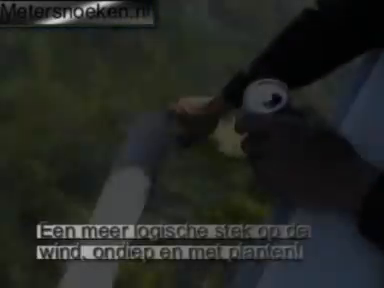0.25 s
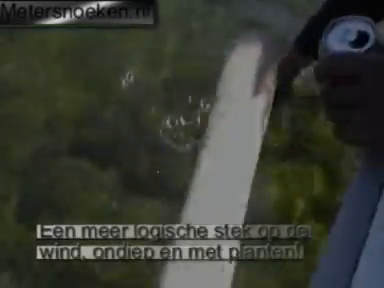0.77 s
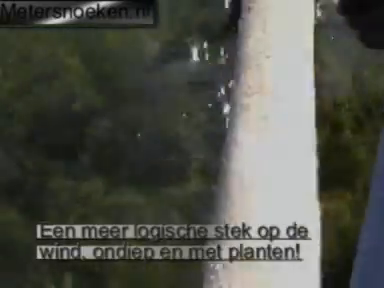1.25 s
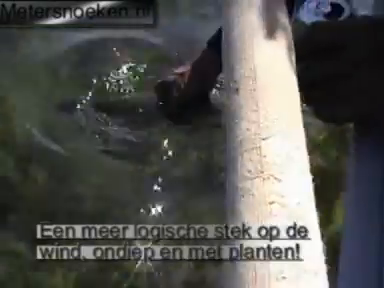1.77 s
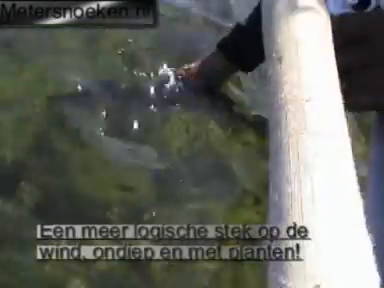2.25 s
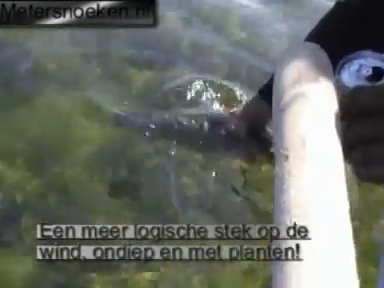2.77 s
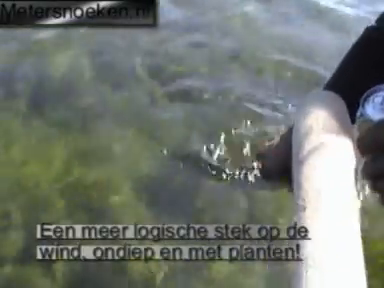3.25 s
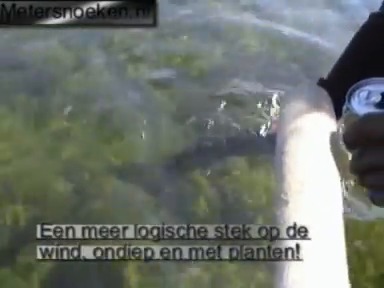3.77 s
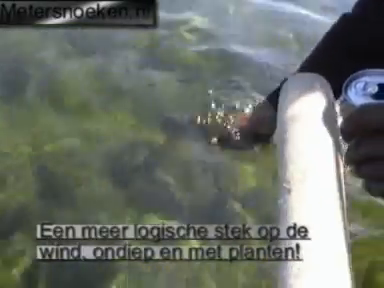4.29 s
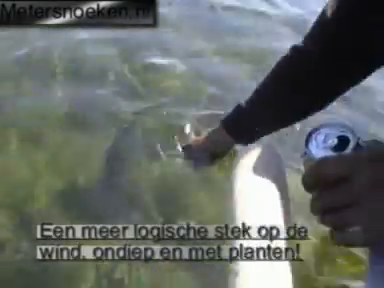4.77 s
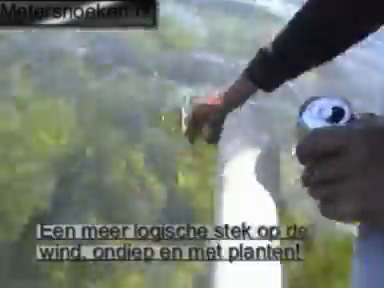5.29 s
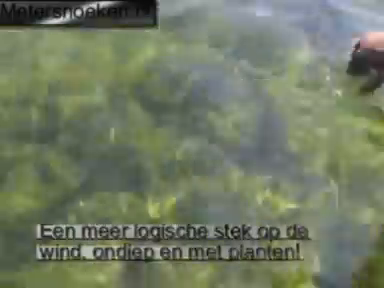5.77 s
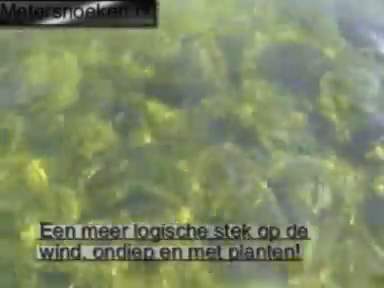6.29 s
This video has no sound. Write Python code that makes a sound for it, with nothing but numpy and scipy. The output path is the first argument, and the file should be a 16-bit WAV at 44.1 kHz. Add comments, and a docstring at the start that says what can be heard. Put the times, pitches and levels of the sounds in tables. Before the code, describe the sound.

Sparse water droplets and soft hull bumps open quietly, then an oar rattles sharply in its lock and bubbles plop around a stirring hand. Tiny pinging drips fill a calm middle while a small bird chirps far off on shore. Water bursts into crisp splashes and gurgles near the end. Outdoor, close stereo pickup, slightly left, with low rumble, light breeze and faint motor hum.

```python
"""Hand stirring a calm lake

Beside a rowing boat, drops tick and splatter (shaped noise), bubbles plop (gliding decaying sines),
the hull gulps once (a rising cavity note) and small waves slosh (swarms of tiny bubbles).
The oar clacks in its lock (struck resonances); far off on the shore a small bird sings (gliding whistles).
Boat rumble and breeze lie beneath. A camera's motor whirs faintly and its hum filter combs everything.
"""
import sys
import numpy as np
from scipy import signal
from scipy.fft import rfft, irfft, next_fast_len
from scipy.io import wavfile
from scipy.ndimage import uniform_filter1d

SR = 44100
rng = np.random.default_rng(int(sys.argv[2]) if len(sys.argv) > 2 else 0)


def persist_wave(psi):
    """Save psi, clipped to +-1, as 16-bit WAV."""
    counts = np.round(np.clip(psi, -1, 1) * 32767).astype(np.int16)
    wavfile.write(sys.argv[1], SR, np.atleast_2d(counts).T)


N = 287973


def amp(db):
    """Decibel law: a level becomes a gain."""
    return 10 ** (np.asarray(db) / 20)


def unit(x):
    """Power normalisation: scale to rms 1."""
    return x / np.sqrt(np.mean(x ** 2) + 1e-20)


def along(points, hz):
    """Logarithmic frequency: interpolate (Hz, value) points on a log axis."""
    f, v = np.transpose(points)
    return np.interp(np.log(hz + 1), np.log(f + 1), v)


def curves(rows):
    """Linear interpolation: one value per sample for each column after the time."""
    s, *cols = np.transpose(rows)
    return [np.interp(np.arange(N) / SR, s, c) for c in cols]


def add(track, s, sound):
    """Superposition: mix a sound into a track at time s."""
    part = track[..., max(round(s * SR), 0):][..., :sound.shape[-1]]
    part += sound[..., :part.shape[-1]]


def filtered(x, response):
    """Linear filtering: multiply the spectrum of x by a response of frequency."""
    n = x.shape[-1]
    m = next_fast_len(n + SR // 8)  # zero padding leaves room for the filter's tail
    return irfft(rfft(x, m) * response(np.fft.rfftfreq(m, 1 / SR)), m)[..., :n]


def shape(points):
    """Spectral envelope: a gain over frequency from (Hz, dB) points."""
    return lambda hz: amp(along(points, hz))


def resonance(hz, centre, width):
    """Damped oscillator: one causal resonance of gain 1 at its centre."""
    return 1j * hz * width / (centre ** 2 - hz ** 2 + 1j * hz * width)


# Left-right correlation of nearby sounds: f/Hz, correlation
NEAR_CORRELATION = [(60, 0.058), (250, 0.34), (600, 0.52), (1200, 0.87), (4000, 0.88), (8000, 0.69),
                    (12000, 0.071)]


def spread(pair, colour, alike=NEAR_CORRELATION):
    """Interchannel correlation: mix two unrelated signals as mid and side into stereo of rms 1."""
    def mid_side(hz):
        angle = np.arccos(np.clip(along(alike, hz), -1, 1)) / 2
        return colour(hz) * np.array([np.cos(angle), np.sin(angle)])
    mid, side = filtered(pair, mid_side)
    return unit(np.array([mid + side, mid - side]))


def noise(colour, size=N, alike=NEAR_CORRELATION):
    """Filtered white noise: coloured stereo of rms 1."""
    return spread(rng.standard_normal((2, size)), colour, alike)


def fizz(spectrum, rate, centre_hz, cycles, scatter_db):
    """Bubble swarm: random grains, rate per second, start softly and rise in pitch; rms 1."""
    count = int(rate * N / SR)
    when, size, pitch, side = rng.random((count, 4)).T[..., None]
    t = np.arange(SR // 100) / SR
    hz = centre_hz * 2 ** (3 * (pitch - .5))  # within 1.5 octaves of the centre
    age = t * hz / cycles
    life = (np.exp(-age) - np.exp(-4 * age)) * (1 - t / t[-1])
    tone = np.sin(2 * np.pi * hz * t * (1 + .015 * np.minimum(age, 6)))
    grains = amp(-scatter_db * np.log(size + .02)) * life * tone
    at = (when * N).astype(int) + np.arange(len(t))
    pair = np.array([unit(np.bincount(at.ravel(), (grains * g).ravel(), N)[:N]) for g in (1, side - .5)])
    return spread(pair, shape(spectrum))


# Left-right correlation of the camera noise: f/Hz, correlation
CAMERA_CORRELATION = [(200, -0.25), (800, 0.38), (4000, 0.77), (7000, 0.2), (9500, 0.17), (11000, -0.75),
                      (12500, -0.9)]
# Spectrum of the drum's ticks: f/Hz, relative level/dB
DRUM_SPECTRUM = [(100, -70), (3000, -25), (5500, -21), (6400, -33), (7000, 13), (8200, 26.5), (9000, -5),
                 (10400, 22.5), (12500, 16)]
HUM_HZ = 150  # turns of the camera's motor per second


def drum_buzz():
    """Periodic impulses: the camera's drum ticks twice a turn, a quarter period apart in mid and side."""
    period = round(SR / HUM_HZ / 2)
    phase = np.arange(N) % period
    ticks = 1. * np.array([phase == 0, phase == period // 4])
    return spread(ticks, shape(DRUM_SPECTRUM), CAMERA_CORRELATION)


# Resonances of the motor's whir: f/Hz, width/Hz, level/dB re CAMERA_LEVEL
WHIR_RESONANCES = [(385, 310, -37), (903.6, 101, -12), (2700, 340, -16)]


def motor_whir():
    """Resonant noise: bands of noise, each filtered twice by one resonance."""
    return sum(amp(db) * noise(lambda hz: resonance(hz, centre, width) ** 2, alike=CAMERA_CORRELATION)
               for centre, width, db in WHIR_RESONANCES)


# Steady motor tones: f/Hz, level/dB re CAMERA_LEVEL
MOTOR_TONES = [(433, -23.5), (727, -18.5), (831, -45)]


def motor_whine(waver_db=2):
    """Amplitude modulation: sines whose levels waver slowly and independently (rms waver in dB)."""
    t = np.arange(N) / SR
    out = np.zeros(N)
    for hz, db in MOTOR_TONES:
        waver = waver_db * unit(filtered(rng.standard_normal(N), lambda f: f < 5))
        out += amp(db + waver) * np.sqrt(2) * np.sin(2 * np.pi * hz * t)
    return out


# Spectrum of air and camera hiss: f/Hz, relative level/dB
HISS_SPECTRUM = [(25, -52), (60, -46), (135, -3.5), (250, -23), (430, -3), (700, -15.5), (1600, -15.5),
                 (2700, -11.5), (4500, -14.5), (6200, -12), (8000, -15.5), (10500, -11.5), (12000, -15),
                 (13500, -32)]
# Common gain of hiss and motor: t/s, level/dB
CAMERA_LEVEL = [(0, -60), (.35, -59.5), (.7, -56), (1, -53), (1.6, -50), (3, -50.5), (5, -50), (6.53, -51)]


def camera():
    """Broadband and tonal machine noise: hiss, whir, whine and buzz share one slow level curve."""
    level_db, = curves(CAMERA_LEVEL)
    hiss = amp(-6) * noise(shape(HISS_SPECTRUM), alike=CAMERA_CORRELATION)
    return amp(level_db) * (hiss + motor_whir() + motor_whine() + amp(7.5) * drum_buzz())


# Puffs of breeze on the microphone: t/s of the peak, level/dB
BREEZE_PUFFS = [(1.599, -63), (2.17, -64.5)]
# Spectrum of the breeze: f/Hz, relative level/dB
BREEZE_SPECTRUM = [(20, -29), (55, 2.5), (100, 1.5), (200, -5.5), (600, -62), (2000, -100)]
# Left-right correlation of the breeze: f/Hz, correlation
BREEZE_CORRELATION = [(40, -0.33), (200, 0.088)]
PUFF_RISE_S, PUFF_FALL_S, CALM_DB = 0.052, 0.16, -82.5  # time constants; level between puffs


def breeze():
    """Turbulence noise: puffs brush the microphone ports and die away exponentially."""
    t = np.arange(N) / SR
    air = np.full(N, amp(CALM_DB))
    for s, db in BREEZE_PUFFS:
        air += amp(db) * np.exp(-np.maximum((s - t) / PUFF_RISE_S, (t - s) / PUFF_FALL_S))
    return air * noise(shape(BREEZE_SPECTRUM), alike=BREEZE_CORRELATION)


# Soft bumps of the boat: t/s, level/dB
BOAT_BUMPS = [(0.152, -55), (0.981, -64), (1.39, -69), (1.559, -76), (2.451, -61.5), (3.57, -75),
              (5.391, -69), (6.289, -72)]
# Spectrum of the hull's rumble: f/Hz, relative level/dB
HULL_SPECTRUM = [(25, -45), (60, -33), (120, -1.5), (190, 2), (350, 1.5), (700, -3.5), (2000, -74)]
# Left-right correlation of the hull's rumble: f/Hz, correlation
HULL_CORRELATION = [(60, 0.66), (200, 0.82), (600, 0.95)]
BUMP_RISE_S, BUMP_T60_S, RUMBLE_DB = 0.011, 0.64, -70.5  # the rumble level excludes hull_db


def boat(hull_db=-1.0, boom_hz=195, boom_db=-1, boom_t60=0.27):
    """Modal and broadband response: a steady rumble swells and the hull booms softly at each bump."""
    t = np.arange(N) / SR
    rumble, boom = np.full(N, amp(RUMBLE_DB)), np.zeros(N)
    rise = np.minimum(t / BUMP_RISE_S, 1)
    for s, db in BOAT_BUMPS:
        add(boom, s, rise * amp(db + boom_db - 60 * t / boom_t60) * np.sin(2 * np.pi * boom_hz * t))
        add(rumble, s, rise * amp(db - 60 * np.maximum(t - BUMP_RISE_S, 0) / BUMP_T60_S))
    return boom + amp(hull_db) * rumble * noise(shape(HULL_SPECTRUM), alike=HULL_CORRELATION)


# Runs of one repeated note: t/s, repeats, note length/s, start f/Hz, end f/Hz, first level/dB
BIRD_SONG = [(1.254, 3, 0.038, 4140, 4400, -62.5), (1.296, 3, 0.036, 6260, 5150, -55),
             (1.715, 6, .07, 5000, 2780, -57), (2.59, 1, 0.076, 3350, 2150, -52.5),
             (2.85, 1, 0.026, 2750, 3100, -57), (4.232, 2, 0.05, 4700, 5500, -60.5),
             (4.646, 1, 0.054, 3710, 3930, -57), (4.682, 1, 0.052, 3950, 5400, -59),
             (4.836, 1, 0.032, 3980, 4100, -52), (4.859, 1, 0.049, 4170, 5500, -52.5),
             (4.906, 1, .036, 5740, 6000, -56), (5.028, 1, 0.026, 6000, 3480, -53),
             (5.057, 1, 0.028, 3070, 3170, -58), (5.088, 1, 0.0287, 3750, 4230, -51),
             (5.101, 1, .03, 4170, 4000, -52), (5.23, 1, .03, 3140, 2950, -58),
             (5.6, 1, 0.032, 3350, 3570, -52), (5.737, 1, 0.039, 2700, 2470, -57)]
NOTE_GAP_S, CRESCENDO_DB = .1445, 1  # from one repeat of a note to the next
QUAVER_SHARE, FLUTTER_DB = .012, 2  # rms stray of pitch (as a share) and of level


def bird(echo_db=-5, echo_t60=0.049, bend=1.1):
    """Frequency modulation and reverberation: gliding, quavering whistles, blurred by trees on the shore."""
    out = np.zeros(N)
    quaver = QUAVER_SHARE * unit(filtered(rng.standard_normal(N), lambda hz: hz < 70))
    for s, repeats, length, start_hz, end_hz, db in BIRD_SONG:
        u = np.linspace(0, 1, int(length * SR))
        glide = start_hz + (end_hz - start_hz) * (1 - np.cos(np.pi * u ** bend)) / 2
        swell = abs(np.sin(np.pi * u)) ** 0.61
        for k in range(repeats):
            start = s + k * NOTE_GAP_S
            hz = glide * (1 + quaver[round(start * SR):][:len(u)])
            whistle = np.sin(2 * np.pi * np.cumsum(hz) / SR)
            add(out, start, amp(db + k * CRESCENDO_DB) * swell * whistle)
    out *= amp(FLUTTER_DB * unit(filtered(rng.standard_normal(N), lambda hz: hz < 90)))
    t = np.arange(SR // 2) / SR
    trees = rng.standard_normal((2, len(t))) * amp(-60 * t / echo_t60)
    trees /= np.linalg.norm(trees[0])
    return out + amp(echo_db) * signal.fftconvolve(out[None], trees, axes=1)[:, :N]


# The oar shifts in its lock: t/s, then level/dB, knock/dB, clank/dB, chink/dB, clink/dB, rattle t60/s
OAR_CLACKS = [(1.1146, -24, -3.5, -1, -2, 0.5, 0.076), (1.1215, -30.5, -14.5, 2, 3, -3, .05),
              (1.3323, -36, -0.5, 8.5, -5, -3, 0.037), (1.812, -26.5, -7, 9, -4.5, -10.5, 0.041),
              (1.8218, -28.5, -11, 6, -0.5, -17, 0.029), (5.3938, -23.5, 1.5, -2.5, -1.5, 0.5, 0.062),
              (5.4192, -20.5, -3.5, 4.5, 1, 1.5, 0.025)]
# Resonances of the oarlock: f/Hz, width/Hz, level/dB
OARLOCK_MODES = [(552, 94, -3), (1640, 143, 7), (2400, 1000, -7.5), (4095, 60, -1.5), (4700, 450, -6.5),
                 (5370, 200, -0.5), (5910, 130, 4), (7005, 95, 7.5), (7820, 340, 7), (9456, 870, 8.5),
                 (9656, 830, 10.5), (11330, 200, 2), (11500, 490, -12)]
# Left-right correlation of the blow: f/Hz, correlation
OAR_CORRELATION = [(600, 0.94), (7000, 0.96), (12000, 0.77)]


def oar(chatter_db=3, scrape_db=-17, strike_db=5, strike_t60=0.0052, detune=0.0042):
    """Modal excitation: a chattering blow sounds resonances that the contact weights and shifts slightly."""
    out, t = np.zeros((2, N)), np.arange(SR // 6) / SR
    for s, db, knock_db, clank_db, chink_db, clink_db, t60 in OAR_CLACKS:
        contact = [(1900, knock_db), (3800, clank_db), (6100, clank_db),
                   (7100, chink_db), (8200, chink_db), (9400, clink_db)]
        shift = 1 + detune * rng.standard_normal(len(OARLOCK_MODES))
        chatter = amp(chatter_db * unit(uniform_filter1d(rng.standard_normal(len(t)), size=60)))
        envelope = chatter * amp(-60 * t / t60) + amp(strike_db - 60 * t / strike_t60)
        force = noise(np.ones_like, size=len(t), alike=OAR_CORRELATION) * envelope
        # the blow's energy does not depend on its chatter
        force *= np.sqrt(t60 / np.sum(force ** 2) * SR / np.log(1000))

        def ring(hz):
            modes = sum((-1) ** k * amp(gain_db) * resonance(hz, centre * shift[k], width)
                        for k, (centre, width, gain_db) in enumerate(OARLOCK_MODES))
            return (amp(scrape_db) + modes) * shape(contact)(hz)
        add(out, s, amp(db + 7.5) * filtered(force, ring))
    return out


# The hand stirring the water: t/s, gurgle level/dB
STIR_LEVEL = [(0, -66), (.8, -61), (1.5, -62), (2.2, -61), (3, -62.5), (4, -66), (4.8, -64.5), (5.3, -58),
              (6.53, -56)]
# Wavelets and swishes: t/s, length/s, gurgle level/dB, spray level/dB
WAVELETS = [(0.086, 0.22, -73, -69), (0.453, 0.12, -75, -94), (1.552, 0.16, -63, -66),
            (1.678, 0.13, -59, -57), (2.457, 0.12, -68, -61), (2.794, 0.065, -60.5, -77),
            (2.881, 0.038, -49, -46), (3.053, .04, -74, -74), (3.575, 0.083, -61.5, -75),
            (4.06, .11, -77, -66), (5.284, 0.044, -50, -55), (5.329, 0.062, -54.5, -41.5),
            (5.396, 0.057, -60, -71), (5.49, 0.11, -58, -67), (5.807, .075, -48.5, -52.5),
            (5.862, 0.034, -44, -48), (6.037, 0.32, -83, -61), (6.246, 0.19, -53, -54),
            (6.372, .036, -64, -50), (6.426, 0.046, -44.5, -46.5), (6.494, 0.048, -56, -54)]
# Spectra of gurgling froth, fine spray, small ringing bubbles and fused bubbles: f/Hz, relative level/dB
FROTH_SPECTRUM = [(60, -70), (200, -30), (450, -1.5), (1000, 3.5), (1900, 5.5), (3200, 1.5), (6000, -63)]
SPRAY_SPECTRUM = [(300, -70), (1500, 3), (3500, -16), (6000, -6), (8500, 1), (10500, 1.5), (13000, -4)]
PLINK_SPECTRUM = [(100, -60), (400, -30), (1200, -27), (3000, 1), (7000, 0.5), (12000, 2)]
WASH_SPECTRUM = [(80, -60), (300, 1), (550, -2.5), (2500, 1), (5000, 3), (12000, -33)]


def water(stir_spray_db=-7, plink_db=-2, wash_db=-9.5):
    """Bubble-swarm radiation: wavelets rise and ebb, stirring gurgle, fine spray and small ringing bubbles."""
    stir_db, = curves(STIR_LEVEL)
    gurgle, spray = amp(stir_db), amp(stir_db + stir_spray_db)
    for s, length, gurgle_db, spray_db in WAVELETS:
        swell = np.sin(np.pi * np.linspace(0, 1, int(length * SR)) ** .7)  # rises faster than it ebbs
        add(gurgle, s, amp(gurgle_db) * swell)
        add(spray, s, amp(spray_db) * swell)
    froth = fizz(FROTH_SPECTRUM, rate=1100, centre_hz=1500, cycles=4, scatter_db=2.8)
    mist = fizz(SPRAY_SPECTRUM, rate=2000, centre_hz=5500, cycles=5, scatter_db=2.8)
    plinks = fizz(PLINK_SPECTRUM, rate=260, centre_hz=3600, cycles=11, scatter_db=3.2)
    wash = noise(shape(WASH_SPECTRUM))  # countless bubbles too small to tell apart
    detail = amp(plink_db) * plinks + amp(wash_db) * wash
    return gurgle * froth + spray * mist + np.sqrt(gurgle * spray) * detail


def gulp(start_s=1.232, empty_hz=480, full_hz=2430, fill_s=0.052, sweep_s=0.02,
         hum_db=-44, peak_db=-23, swell_s=0.011, seal_s=0.023, open_db=-9):
    """Cavity resonance: air under the hull seals and fills; its note rises, loudest where it fills fastest."""
    out, t = np.zeros(N), np.arange(SR // 10) / SR
    filled = (1 + np.tanh((t - fill_s) / sweep_s)) / 2
    burst = amp(peak_db + open_db * (t < seal_s)) * np.exp(-((t - fill_s) / swell_s) ** 2)
    level = amp(hum_db) * (1 - filled) + burst
    hz = empty_hz + (full_hz - empty_hz) * filled
    add(out, start_s, level * np.sin(2 * np.pi * np.cumsum(hz) / SR))
    return out


# A wavelet's bubbles: rate, middle pitch, level over its gurgle, swell time in cycles
TRAPPED_PER_S, TRAPPED_HZ, TRAPPED_DB, TRAPPED_CYCLES = 180, 1900, 2, 4.2


def trapped(scatter_db=4, scatter_octaves=1.126, glide=0.069):
    """Air entrainment: wavelets trap small bubbles at random, as rows like those of AIR_POCKETS."""
    rows = []
    for s, length, gurgle_db, _ in WAVELETS:
        for when, size, pitch in rng.random((50, 3))[:round(TRAPPED_PER_S * length)]:
            hz = TRAPPED_HZ * 2 ** (scatter_octaves * (2 * pitch - 1))
            db = gurgle_db + TRAPPED_DB + scatter_db * (2 * size - 1)
            rows.append((s + when * length, db, hz, TRAPPED_CYCLES / hz, glide))
    return rows


# Air pockets that ring as they close: t/s, peak level/dB, start f/Hz, swell time/s, pitch glide as a share
AIR_POCKETS = [(0.4355, -46, 1620, 0.0015, -0.014), (.449, -46, 1730, 0.0011, .03),
               (.465, -51, 1610, 0.0025, 0.027), (0.499, -48, 1600, .0018, .03),
               (1.459, -46, 1650, 0.0044, 0.11), (1.57, -30.5, 1550, 0.0018, -0.019),
               (1.571, -45, 846, 0.0031, -0.026), (1.583, -45, 1510, 0.0055, -0.019),
               (1.623, -48, 980, 0.0014, -0.034), (1.645, -40.5, 3100, 0.0016, -0.00092),
               (1.682, -44.5, 1640, 0.0067, -0.095), (1.697, -36.5, 868, 0.0052, 0.082),
               (1.7, -28.5, 1450, 0.0012, 0.033), (1.709, -38, 1350, 0.0018, -0.014),
               (1.728, -38.5, 1720, 0.0025, -0.0076), (1.729, -41, 976, 0.004, 0.2),
               (1.746, -37, 1526, 0.0049, 0.28), (1.868, -47, 787, 0.006, -0.035),
               (2.081, -41, 1690, 0.0018, 0.014), (2.083, -44.5, 3080, .002, -0.059),
               (2.087, -44, 1410, .008, 0.26), (2.11, -31.5, 1693, 0.0019, 0.075),
               (2.507, -41.5, 1540, 0.0013, 0), (2.525, -39.5, 2360, .00093, 0),
               (2.803, -50, 1900, 0.0016, .1), (2.8945, -38, 604, .0011, 0.13),
               (2.901, -36, 1000, 0.0027, 0.09), (2.92, -37, 1020, 0.0039, -0.018),
               (3.0615, -43, 750, 0.0019, 0.07), (3.155, -53, 2060, 0.0033, 0.09),
               (3.197, -54, 1970, 0.0038, .03), (3.279, -44, 2574, 0.0044, 0.086),
               (3.592, -44, 1530, 0.0025, .05), (3.594, -50, 4350, .002, 0),
               (3.604, -46, 1650, 0.0032, 0.051), (3.619, -44, 1630, 0.0036, 0.011),
               (5.277, -36, 2210, 0.0014, 0.017), (5.2815, -19, 2300, 0.00039, 0.031),
               (5.2838, -12.5, 4700, 0.00047, -0.22), (5.2905, -27, 4280, 0.00067, -0.071),
               (5.293, -28.5, 1490, 0.0023, 0.052), (5.3008, -28, 1080, 0.00098, -0.46),
               (5.305, -34, 760, 0.0037, 0.005), (5.314, -36, 810, 0.0025, 0.011),
               (5.317, -35, 1640, 0.0029, 0.1), (5.332, -38, 780, 0.001, 0.021),
               (5.333, -31.5, 1660, 0.0013, 0.037), (5.344, -38, 2560, .001, -0.013),
               (5.365, -26, 2530, 0.0012, -0.021), (5.381, -46, 890, .004, -0.062),
               (5.395, -34, 540, 0.0045, 0.027), (5.436, -58, 240, .01, -0.014),
               (5.487, -36.5, 946, 0.003, .06), (5.641, -22.5, 992, 0.0049, 0.35),
               (5.68, -41, 1960, 0.0026, 0.0081), (5.794, -32.5, 1134, 0.007, 0.065),
               (5.811, -26.5, 926, 0.0046, 0.19), (5.843, -41.5, 3070, 0.0036, -0.012),
               (5.845, -36, 1008, 0.0114, 0.163), (5.8643, -28.5, 923, 0.0021, -0.0084),
               (5.872, -26, 987, 0.0032, 0.22), (5.87, -32, 3770, 0.0024, 0.082),
               (5.872, -42, 5530, 0.0022, .02), (5.889, -29.5, 2040, 0.0014, -0.0055),
               (5.9313, -27.5, 930, 0.0011, 0.049), (6.015, -46, 1550, 0.0044, 0.29),
               (6.07, -46, 1810, .002, 0.059), (6.099, -41.5, 1350, 0.0028, 0.16),
               (6.178, -40.5, 1540, 0.0027, 0.065), (6.236, -35, 1300, 0.0014, 0.0073),
               (6.243, -26.5, 1197, 0.0023, 0.12), (6.257, -31, 1040, 0.0019, 0.014),
               (6.2695, -31, 801, 0.0047, 0.15), (6.269, -39, 1330, 0.003, -0.22),
               (6.293, -31.5, 1036, 0.0062, 0.11), (6.309, -39, 468, 0.0055, -0.0024),
               (6.304, -33, 1300, 0.0013, -0.039), (6.309, -24.5, 1070, 0.0011, 0.099),
               (6.311, -31.5, 1704, 0.0024, 0.043), (6.4462, -23.5, 1000, 0.0012, -0.03),
               (6.447, -30, 2070, .0012, .05), (6.459, -27.5, 1910, 0.0017, -0.045),
               (6.4667, -31.5, 1540, 0.00072, .05), (6.478, -27, 1430, 0.0014, 0.092),
               (6.498, -32, 1080, 0.004, 0.15), (6.511, -28, 1300, 0.0013, 0.08),
               (6.5225, -22.5, 1770, 0.0014, 0.11)]


def bubbles(glide_swells=3):
    """Bubble resonance: air swells and rings; its pitch glides, mostly up near the surface, then settles."""
    out, t = np.zeros(N), np.arange(SR // 16) / SR
    for s, db, hz, swell, glide in AIR_POCKETS + trapped():
        u = t / swell
        pitch = hz * (1 + glide * np.tanh(u / glide_swells))
        envelope = (u * np.exp(1 - u)) ** 1.13
        add(out, s, amp(db) * envelope * np.sin(2 * np.pi * np.cumsum(pitch) / SR))
    return out


# Drips that ping: t/s, level/dB, f/Hz
PINGING_DRIPS = [(0.488, -37.5, 5500), (1.676, -35.5, 7600), (2.68, -41.5, 3720), (3.231, -37, 3950),
                 (3.385, -43, 5300), (3.48, -42.5, 7100), (3.487, -46, 6640), (3.489, -40.5, 8950),
                 (3.679, -38, 6760), (3.94, -36, 5240), (4.003, -42.5, 8200), (4.024, -40.5, 6100),
                 (4.065, -45, 7360), (4.079, -45, 3300), (4.087, -40.5, 7260), (4.097, -42, 3370),
                 (4.114, -40, 5800), (4.215, -44, 5470), (5.7218, -31, 6730), (6.004, -33.5, 9840),
                 (6.098, -38, 6000), (6.109, -31.5, 6030), (6.131, -40, 5300), (6.2292, -29.5, 8700)]


def drips(ring_t60=0.01, tick_t60=0.017, tick_db=-9):
    """Impact and bubble ringing: a drip from the wet hand ticks and leaves one tiny pinging bubble."""
    out, t = np.zeros((2, N)), np.arange(SR // 30) / SR
    for s, db, pitch in PINGING_DRIPS:
        ping = np.sin(2 * np.pi * pitch * t) * amp(-60 * t / ring_t60)
        hiss = noise(lambda hz: resonance(hz, pitch, pitch / 2), size=len(t))
        tick = hiss * amp(tick_db - 60 * t / tick_t60)
        add(out, s, amp(db) * (ping + tick))
    return out


# Drops and small splats: t/s, level/dB, centre f/Hz, t60/s, spectral width/octaves
SPLASH_DROPS = [(0.436, -40.5, 10000, 0.03, .5), (0.5004, -37.5, 4000, .031, 0.89),
                (0.7703, -41.5, 10000, .015, 1.6), (0.8478, -31.5, 2420, 0.042, 1.6),
                (0.9955, -16.5, 8470, 0.029, 0.28), (0.9959, -17, 1370, 0.033, 1.3),
                (1.042, -30.5, 6240, 0.036, 0.68), (1.23, -44, 1100, 0.016, 0.53),
                (1.5627, -36, 8750, .021, 1), (1.5696, -30.5, 3960, .016, 1.5),
                (1.6231, -22.5, 8800, 0.019, 3.8), (1.697, -28, 4500, 0.034, 1.2),
                (1.951, -25.5, 9000, 0.0083, 3.4), (2.013, -28.5, 2770, 0.043, 1.2),
                (2.108, -27, 2110, 0.059, 0.62), (2.4625, -22.5, 3400, 0.044, 0.76),
                (2.824, -39.5, 2000, 0.026, 1.2), (2.879, -32, 1790, 0.016, 0.72),
                (2.888, -29, 5000, .014, 1.1), (2.8944, -23, 3900, 0.016, 0.61),
                (3.061, -31, 3500, 0.031, 0.89), (3.2289, -33, 4760, 0.018, 0.96),
                (3.608, -40, 2900, .07, .6), (5.155, -35, 1500, 0.018, 1.8), (5.174, -31, 1270, 0.014, 1.1),
                (5.219, -33.5, 2500, 0.028, 1.4), (5.2805, -19.5, 3870, 0.027, 0.58),
                (5.286, -21, 3200, .015, 0.51), (5.3002, -16.5, 2400, 0.019, 0.7),
                (5.3034, -34, 3000, .02, 1.2), (5.315, -37, 3500, .02, 1.5), (5.3634, -30, 7500, .02, 0.82),
                (5.526, -38, 2000, .02, 1.6), (5.552, -42, 4500, .02, 1), (5.578, -35, 2000, .02, 0.91),
                (5.6413, -25, 2550, 0.055, 1.4), (5.826, -33, 4000, 0.018, 0.32),
                (5.873, -22, 5000, 0.024, 2.3), (5.8905, -29, 2500, 0.054, 0.34),
                (5.919, -33.5, 3000, 0.026, 0.64), (6.025, -25.5, 3340, 0.02, 0.84),
                (6.1645, -35, 5000, .015, 1.5), (6.187, -33, 5000, .015, .9), (6.2, -27.5, 5000, .018, 1.4),
                (6.264, -29, 5800, .02, 0.3), (6.316, -26, 7900, .025, 0.31),
                (6.327, -17, 3640, 0.052, 1.05), (6.372, -24.5, 4500, 0.029, 0.6),
                (6.3888, -16.5, 5950, 0.035, 0.66), (6.4255, -20.5, 1890, 0.057, 1.6),
                (6.4593, -25, 2800, .025, 0.38), (6.4794, -17, 9000, 0.023, 1.7),
                (6.507, -28, 7460, 0.031, 1)]


def drops(click_db=6, tick_t60=0.0029, splat_db=-12.5, tick_db=-8, crackle_db=3,
          body_db=-14, body_hz=1300, body_width_hz=1800, rise_share=0.016):
    """Impact noise: a drop clicks and ticks, then splatters raggedly; long splats land more softly."""
    out, t = np.zeros((2, N)), np.arange(SR // 8) / SR
    impact = 1. * (np.arange(len(t)) == 12)  # one impulse
    for s, db, centre, t60, octaves in SPLASH_DROPS:
        def colour(hz):
            band = np.exp(-.5 * (np.log2((hz + 1) / centre) / octaves) ** 2)
            return band + amp(body_db) * abs(resonance(hz, body_hz, body_width_hz))
        hardness = min(1, .03 / t60) ** 4
        click = filtered(impact, colour)
        crackle_now_db = crackle_db * unit(uniform_filter1d(rng.standard_normal(len(t)), size=70))
        tick = hardness * amp(tick_db - 60 * t / tick_t60)
        splat = (1 - np.exp(-t / (rise_share * t60))) * amp(splat_db + crackle_now_db - 60 * t / t60)
        add(out, s, amp(db + click_db) * hardness * click / np.linalg.norm(click))
        add(out, s, amp(db) * (tick + splat) * noise(colour, size=len(t)))
    return out


def lean_left(sound, db):
    """Interchannel level difference: raise the left and lower the right by db."""
    return sound * amp([[db], [-db]])


def scene(thin_hz=270):
    """Superposition of sources: small contacts radiate little bass; all but the camera lean left."""
    highpass = signal.butter(2, thin_hz, "high", fs=SR, output="sos")
    contacts = signal.sosfilt(highpass, drops() + drips() + oar())
    surroundings = lean_left(boat() + breeze(), 2.5) + bird()
    lake = contacts + bubbles() + gulp() + water()
    return lean_left(lake + surroundings, .8) + camera()


TOP_HZ = 13700  # upper band limit


def record(dry, depth=0.42, memory=0.49):
    """Comb filtering: subtracting a fading mean of past motor turns notches every multiple of the hum."""
    def response(hz):
        turn = np.exp(-2j * np.pi * hz / HUM_HZ)  # delay of one motor turn
        comb = 1 - depth * turn / (1 - memory * turn)
        band = 1 / (1 + (hz / TOP_HZ) ** 80)
        return comb * shape([(11000, 0), (12200, -5), (13400, -14)])(hz) * band
    return filtered(dry, response)


dry = scene()
out = record(dry)
persist_wave(out)
```